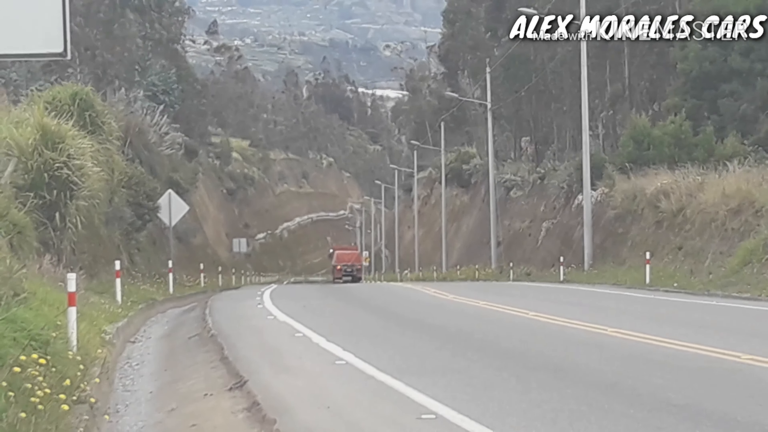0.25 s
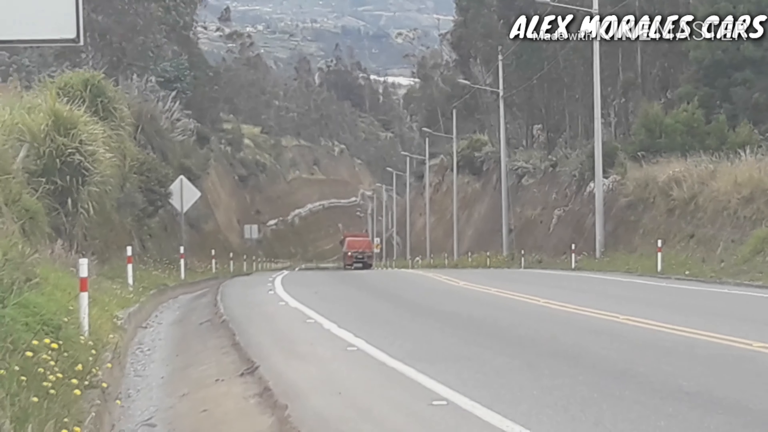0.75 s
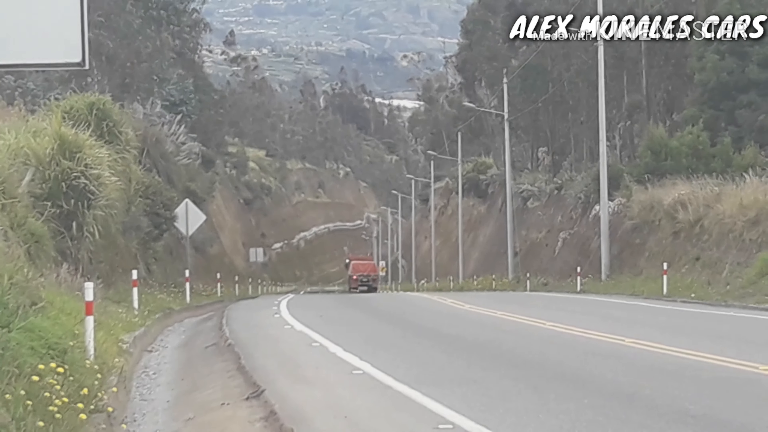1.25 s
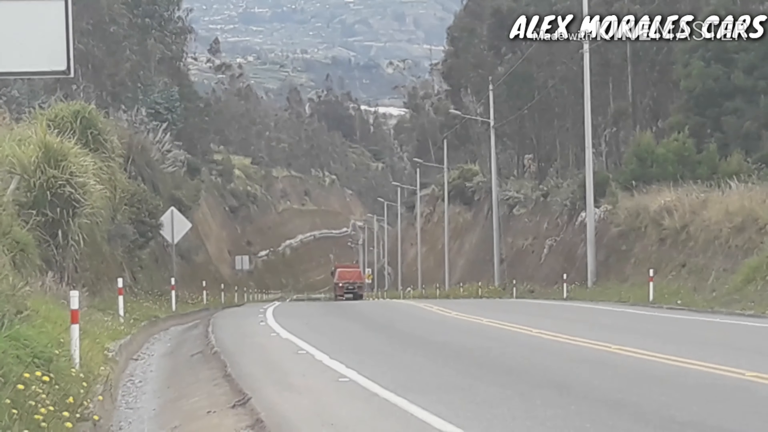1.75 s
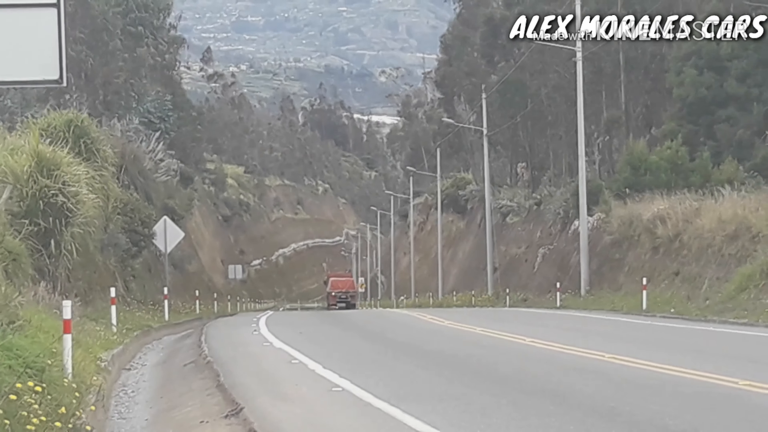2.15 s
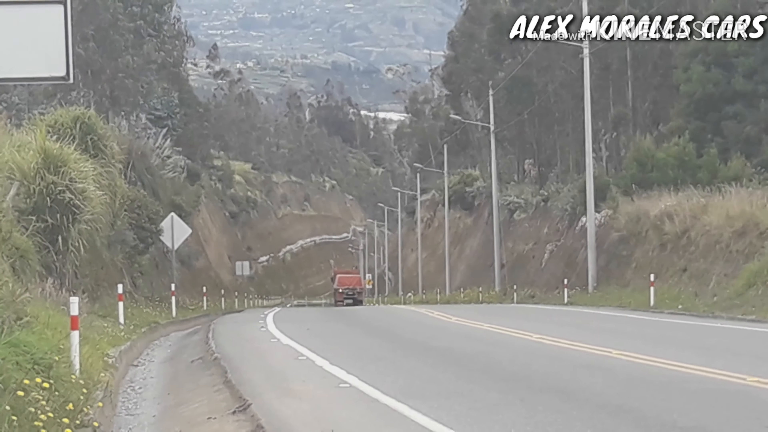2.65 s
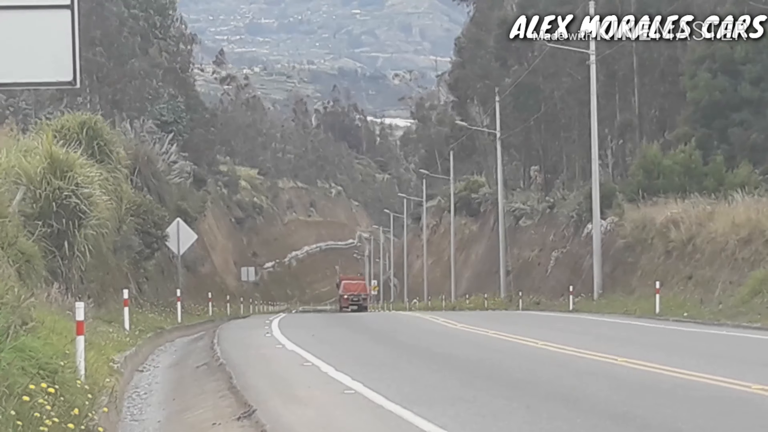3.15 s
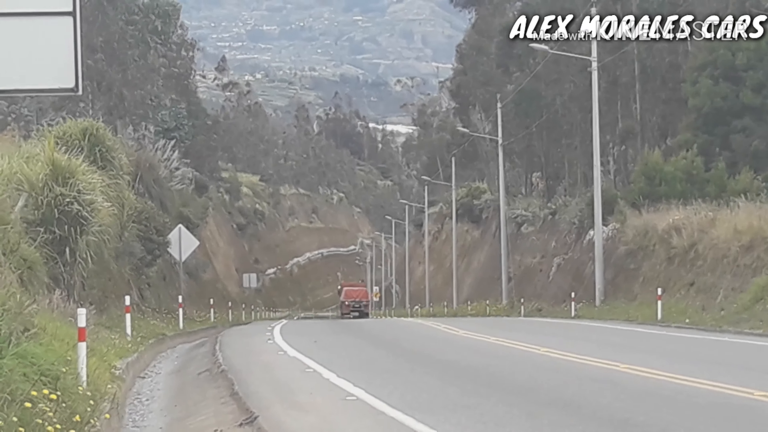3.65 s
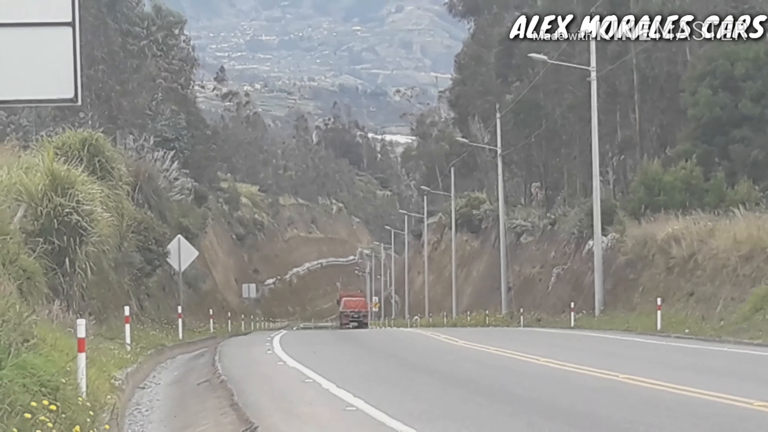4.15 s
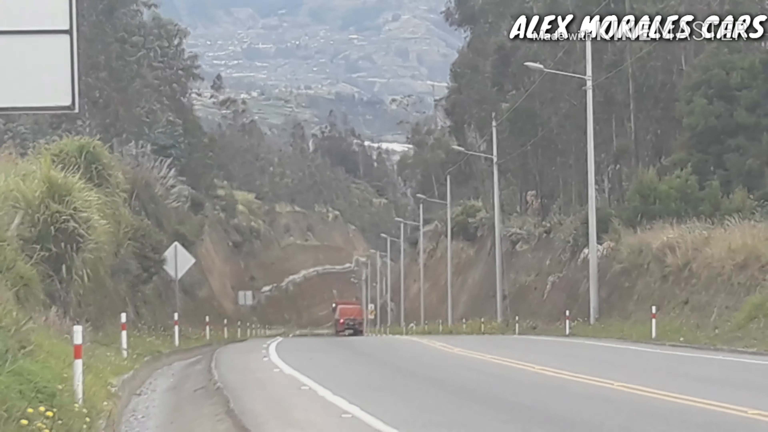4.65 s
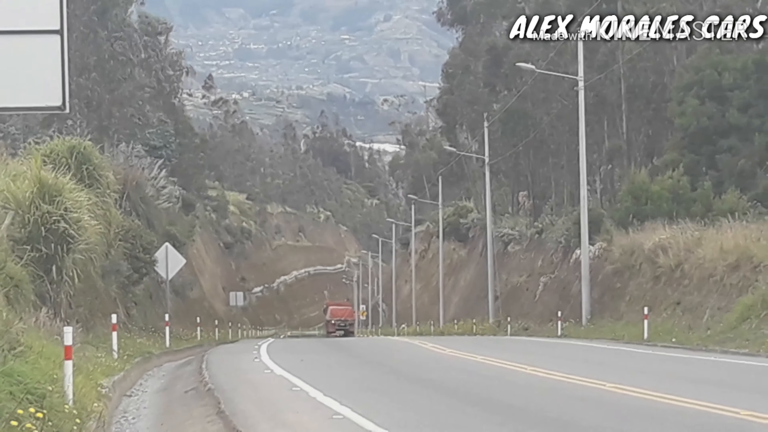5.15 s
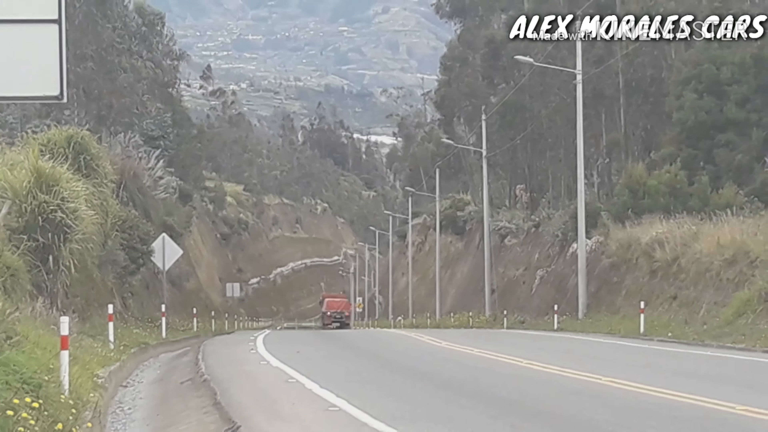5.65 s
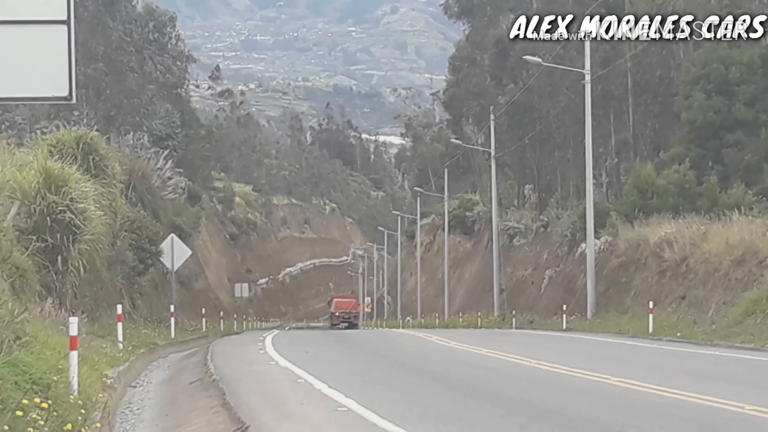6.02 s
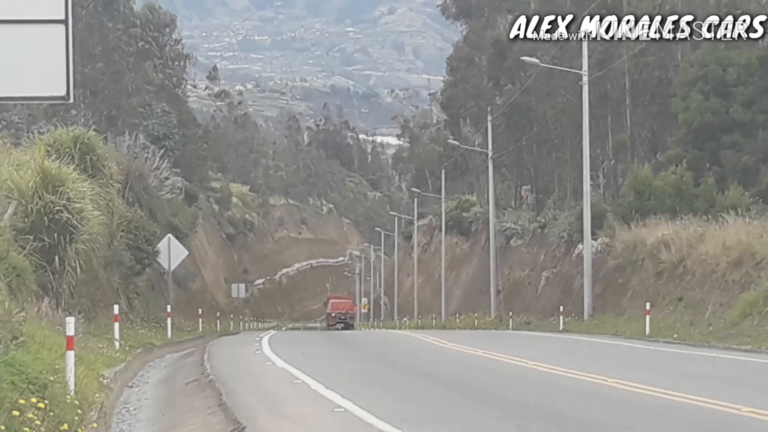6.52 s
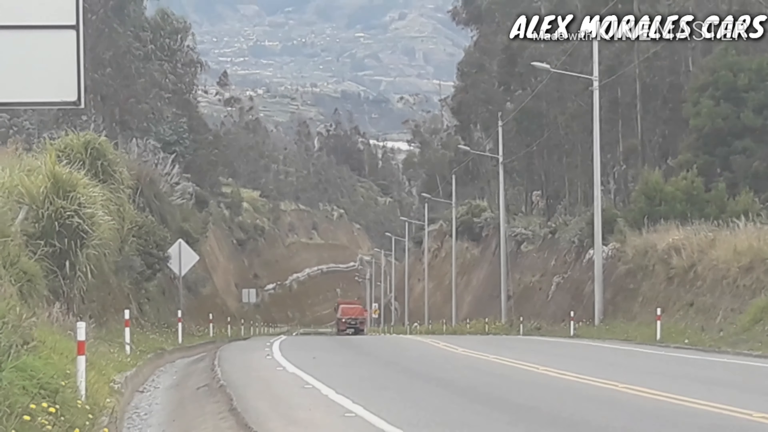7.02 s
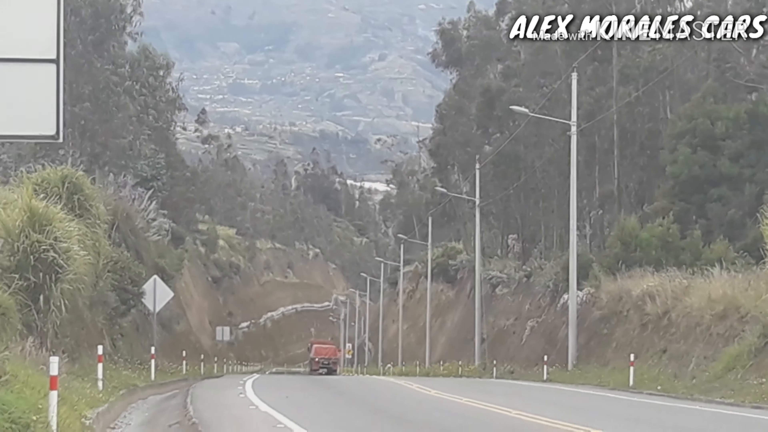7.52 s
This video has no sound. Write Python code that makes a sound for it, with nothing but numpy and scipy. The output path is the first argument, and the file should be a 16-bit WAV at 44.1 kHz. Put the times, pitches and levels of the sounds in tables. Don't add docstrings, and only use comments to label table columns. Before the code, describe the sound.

Low buzzing engine-brake drone of a faraway truck on a mountain road, faint bird whistles, and a sudden harsh burst of microphone handling.

```python
import sys
import numpy as np
from scipy import signal
from scipy.fft import rfft, irfft, next_fast_len
from scipy.io import wavfile
from scipy.ndimage import uniform_filter1d

SR = 44100
rng = np.random.default_rng(int(sys.argv[2]) if len(sys.argv) > 2 else 0)


def dump_mix(stems):
    frames = np.atleast_2d(stems).T
    limited = np.clip(frames, -1, 1)
    pcm = np.round(limited * 32767).astype(np.int16)
    wavfile.write(sys.argv[1], SR, pcm)


def ratio(d):
    e = np.asarray(d, float) / 20
    return 10 ** e


N = 343098


def evened(x):
    return x / np.sqrt(np.mean(x ** 2) + 1e-20)


def read(points, hz):
    f, value = np.transpose(points)
    return np.interp(np.log(hz + 1), np.log(f + 1), value)


def columns(rows):
    s, *values = np.transpose(rows)
    return [np.interp(np.arange(N) / SR, s, v) for v in values]


def eased(rows):
    s, value = np.transpose(rows)
    place = np.interp(np.arange(N) / SR, s, np.arange(len(s)))
    smooth_place = np.floor(place) + (1 - np.cos(np.pi * (place % 1))) / 2
    return np.interp(smooth_place, np.arange(len(s)), value)


def coloured(x, spectrum):
    size = next_fast_len(N)
    gain = ratio(read(spectrum, np.fft.rfftfreq(size, 1 / SR)))
    return irfft(rfft(x, size) * gain, size)[:N]


def wander(count, per_s):
    width = max(round(100 / per_s), 1)
    z = rng.standard_normal((count, N * 100 // SR + 2))
    return evened(uniform_filter1d(uniform_filter1d(z, width, 1), width, 1))


def engine_speed():
    # time in seconds, shaft speed in Hz.
    speed_points = [(0, 34.19), (.45, 34.26), (.85, 34.06), (1.35, 34.26), (2.15, 33.98), (3.2, 33.52),
                    (3.55, 33.48), (4.0, 33.12), (4.4, 33.01), (5.0, 34.65), (5.18, 34.5), (5.66, 37.2),
                    (6.15, 35.55), (6.6, 36.58), (7.18, 35.2), (7.78, 35.0)]
    return eased(speed_points)


def brake():
    # time in seconds, level in dB, colour (0 first stretch of road, 1 second stretch,
    # 2 gear caught, 3 speed hunting), rasp in dB.
    path_points = [(0, 1.6, 1, -4), (.6, 0.26, 0.3, -8), (1.6, 0.45, 0, 6), (2.4, -0.056, 0.1, 3),
                   (3, -0.57, 1.43, 4), (3.8, -1.1, 0.96, -5), (4.36, 0.38, 1, -6), (5.02, -1.5, 3, 3.5),
                   (5.3, 0.6, 1.5, 5), (5.45, -0.013, 3, 3), (7.78, 1.6, 3.5, 5.5)]
    level_db, colour, rasp_db = columns(path_points)
    t = np.arange(N) / SR
    gear_out_s, let_go_s, gear_in_s, bite_s = 4.335, .085, 5.0, .03
    coasting = np.clip((t - gear_out_s) / let_go_s, 0, 1) - np.clip((t - gear_in_s) / bite_s, 0, 1)
    return level_db - 16.5 * coasting, colour, rasp_db + 13 * coasting


def exhaust_tones(turns, speed, colour, pipe, sway_db=1.2, jitter_rad=.022, uneven_rad=.9, scatter_rad=.35):
    # order (multiple of the shaft speed), rms level in dB in each of the four colours.
    strong_orders = [(2.5, -51, -59, -51, -58), (3.0, -60, -59, -60, -51), (5.0, -58, -54, -63, -63),
                     (6.0, -58, -60, -77, -70), (7.0, -73, -69, -55, -62), (9.0, -57, -59, -50, -48),
                     (10.0, -57, -54, -65, -71), (11.0, -67, -66, -60, -56), (12.0, -53, -54, -56, -58),
                     (12.5, -56, -62, -66, -67), (13.0, -52, -57, -64, -62), (14.0, -63, -64, -56, -58),
                     (15.0, -69, -62, -69, -63), (16.0, -64, -67, -68, -63), (17.0, -53, -57, -64, -62),
                     (17.5, -63, -65, -73, -71), (19.0, -60, -66, -63, -66), (20.0, -62, -58, -64, -56),
                     (20.5, -73, -69, -67, -66), (23.0, -68, -73, -63, -67), (29.0, -90, -90, -71, -75),
                     (32.5, -82, -84, -86, -76), (33.0, -82, -84, -81, -81), (35.5, -80, -87, -90, -84)]
    # pitch in Hz, width in Hz, level in dB.
    bank_dips = [(319, 4, -10), (388, 4, -7), (517, 8, -8), (706, 10, -7)]
    strong = {row[0]: row[1:] for row in strong_orders}
    step = 8
    t, grid = np.arange(0, N + step, step) / SR, np.arange(N * 100 // SR + 2) / 100
    coarse_turns = np.interp(t * SR, np.arange(N), turns)
    tint, shaft_hz = (np.interp(grid * SR, np.arange(N), c) for c in (colour, speed))
    echoes = np.interp(tint, np.arange(4), [2.2, 1, 2, 2.4])
    level, phase, chance = wander(count=96, per_s=2.9), wander(count=96, per_s=2.3), rng.standard_normal((96, 2))
    low = np.zeros(len(t))
    for k, order in enumerate(np.arange(4, 100) / 2):
        if order in strong:
            db = np.interp(tint, np.arange(4), strong[order]) + 1
        else:
            db = -68 + read(pipe, order * speed[0]) + 2.2 * chance[k, 0]
        for dip_hz, width, dip_db in bank_dips:
            db = db + dip_db * np.exp(-((order * shaft_hz - dip_hz) / width) ** 2)
        lean = uneven_rad * [0, 1, -1][round(order) % 3] + scatter_rad * echoes * chance[k, 1]
        waver = jitter_rad * order * (.5 + tint / 3) * phase[k]
        swayed = ratio(db + sway_db * level[k]) * np.exp(1j * (lean + waver))
        low += (np.interp(t, grid, swayed) * np.exp(2j * np.pi * order * coarse_turns)).real
    return np.sqrt(2) * signal.resample_poly(low, step, 1)[:N]


def exhaust_puffs(turns, rasp_db, pipe):
    # pitch in Hz, level in dB.
    rasp_colour = [(800, -24), (1000, 5), (1250, 6.5), (1380, -6.5), (1550, -1.5), (1750, -44), (2300, -31)]
    blow = (3 * turns).astype(int)
    cylinder_db = np.array([3, -2, 0, 1, -3, -1])[blow % 6]
    strength = ratio(cylinder_db + 1.2 * rng.standard_normal(blow[-1] + 1)[blow])
    gas = (0.24 + strength * np.exp(-(3 * turns % 1) / 0.52)) * rng.standard_normal(N)
    rush = ratio(-53) * evened(coloured(gas, pipe))
    return rush + ratio(-74.5 + rasp_db) * evened(coloured(gas, rasp_colour))


def exhaust():
    # pitch in Hz, level in dB.
    pipe_colour = [(60, -38), (200, -5), (330, 0.5), (800, -5.5), (950, -22), (1250, -36), (1600, -32),
                   (2100, -56)]
    speed, (brake_db, colour, rasp_db) = engine_speed(), brake()
    turns = np.cumsum(speed) / SR
    hard_blow_s = 3.205
    turns = turns - turns[round(hard_blow_s * SR)] + 200
    tones = exhaust_tones(turns, speed, colour, pipe_colour)
    return ratio(brake_db) * (tones + exhaust_puffs(turns, rasp_db, pipe_colour))


def whine():
    whine_levels = [-72, -66, -71, -72]
    # time in seconds, pitch in Hz, level in dB.
    free_whine = [(4.36, 835, -90), (4.42, 865, -73), (4.55, 903, -77), (4.85, 905, -78), (5.0, 895, -81),
                  (5.1, 880, -90)]
    speed, (brake_db, colour, _), (free_hz, free_db) = engine_speed(), brake(), columns(free_whine)
    slow = wander(count=2, per_s=7.6)
    flutter_db, drift = (np.interp(np.arange(N) * 100 / SR, np.arange(len(w)), w) for w in slow)
    engaged_hz = 25.25 * speed * (1 + 0.0013 * drift)
    engaged_db = np.interp(colour, np.arange(4), whine_levels) + brake_db
    engaged = np.sin(2 * np.pi * np.cumsum(engaged_hz) / SR) * ratio(engaged_db)
    free = np.sin(2 * np.pi * np.cumsum(free_hz * (1 + 0.0042 * drift)) / SR) * ratio(free_db)
    gear_out = np.clip(1 - ratio(brake_db), 0, 1)
    return np.sqrt(2) * ratio(1.5 * flutter_db) * (engaged + free * gear_out)


def road(patchy_db=2.0):
    # pitch in Hz, level in dB per Hz.
    road_colour = [(20, -45), (43, -26.5), (75, -2.5), (190, -10), (487, -26.5), (860, -31.5), (980, -42.5),
                   (2300, -49.5)]
    # time in seconds, dB above the road, half width in seconds.
    road_lumps = [
        (.1, 3.5, 0.054),
        (.62, 1, 0.11),
        (.765, 9.5, 0.027),
        (2.52, 1.5, .08),
        (2.67, -5, 0.054),
        (2.88, 2, .05),
        (4.62, -1.5, 0.034),
    ]
    hz = np.fft.rfftfreq(2048, 1 / SR)
    a, b, patches = rng.standard_normal((N // 512 + 5, 1025, 3)).T
    patches = evened(uniform_filter1d(uniform_filter1d(patches, 5, 0), 8, 1))
    colour_db = read(road_colour, hz) - np.maximum(hz - road_colour[-1][0], 0) / 30
    z = (a + 1j * b) * ratio(colour_db[:, None] + patchy_db * patches)
    rumble = evened(signal.istft(z, nperseg=2048, noverlap=1536)[1][:N])
    t = np.arange(N) / SR
    lumps_db = sum(db * np.exp(-((t - s) / width) ** 2) for s, db, width in road_lumps)
    return ratio(-45 - 0.4 * t + lumps_db) * rumble


def self_noise():
    # pitch in Hz, level in dB per Hz.
    hiss_colour = [(1060, -27), (1800, -3), (4010, -2.5), (7590, -13), (14900, -2), (15400, -7)]
    return ratio(-68.5) * evened(coloured(rng.standard_normal(N), hiss_colour))


def bumps():
    # time in seconds, peak in dB, pitch in Hz, tick in dB.
    case_bumps = [
        (.7525, -28, 105, -19),
        (.868, -56, 300, 3),
        (7.277, -27, 180, -40),
    ]
    out, t = np.zeros(N), np.arange(2000) / SR
    for s, db, hz, tick_db in case_bumps:
        swing = -np.sin(2 * np.pi * hz * t) * t * np.exp(-t / 0.0027)
        tick = ratio(tick_db) * rng.standard_normal(len(t)) * np.exp(-abs(t - .007) / 0.0011)
        dull_tick = uniform_filter1d(uniform_filter1d(tick, size=6), size=6)
        out[round(s * SR):][:len(t)] += ratio(db) * (swing / abs(swing).max() + dull_tick)
    return out


def bird():
    # seconds from the start of the whistle, pitch in Hz, level in dB.
    whistle_points = [(0, 3330, -15), (.03, 3200, -7), (.055, 3070, 0), (.07, 2960, 0), (.09, 2830, -6),
                      (.125, 2580, -4), (.145, 2520, -16)]
    # start in seconds, level in dB.
    bird_calls = [
        (4.3, -64),
        (6.85, -68),
    ]
    out, (s, hz, db) = np.zeros(N), np.transpose(whistle_points)
    t = np.arange(0, s[-1], 1 / SR)
    for start, call_db in bird_calls:
        tremble = 1 + 0.34 * np.cos(2 * np.pi * 38 * (t - .062))
        note = np.sin(2 * np.pi * np.cumsum(np.interp(t, s, hz)) / SR) * ratio(call_db + np.interp(t, s, db))
        out[round(start * SR):][:len(t)] += note * tremble * signal.windows.tukey(len(t), .2)
    i = np.arange(8000)
    trees = rng.standard_normal(8000) * (rng.random(8000) < .03) * ratio(-60 * i / SR / .3) * (i > 700)
    return out + ratio(-8) * signal.oaconvolve(out, trees / np.linalg.norm(trees))[:N]


def finger(slips_per_s=1500, spread_db=3.0):
    # time in seconds, pressure in dB, slide in dB (scrape for that pressure).
    rub_strokes = [
        [(7.276, -55, -25), (7.281, -37, -30), (7.3, -28, -35), (7.32, -17.5, -17), (7.35, -17.5, -12.5),
         (7.41, -3.5, -10), (7.44, -5, 0), (7.46, -4.5, -5), (7.52, -4, -10.5)],
        [(7.53, -21.5, -6.5), (7.555, -14.5, -10), (7.577, -18, -7.5), (7.586, -33.5, -11), (7.605, -48, -9)],
        [(7.622, -35.5, -18), (7.632, -9, -13), (7.638, -5.5, -11), (7.66, -14.5, -2.5), (7.705, -21.5, -6),
         (7.718, -28, 5), (7.732, -54, 6.5), (7.78, -50.5, 2)],
    ]
    # pitch in Hz, level in dB.
    thud_colour, push_colour = [(100, -19), (200, 0.5), (300, 2), (500, -2.5), (800, -5), (1300, -18),
                                (2500, -70)], [(20, -48), (60, 5), (120, 20), (190, 15), (300, -61)]
    scrape_colour, fizz_colour = [(500, -10), (1200, 3.5), (2500, -3), (4000, -11.5), (6000, -26),
                                  (7500, -44), (9000, -62)], [(6000, -25), (9000, -14), (11000, -1), (14500, 0),
                                                  (15500, 2), (15900, -50)]
    # time in seconds, peak in dB.
    nail_catches = [
        (7.3214, -53),
        (7.3771, -31),
        (7.3916, -16),
        (7.4024, -23),
        (7.4101, -24),
        (7.5198, -29),
        (7.637, -42),
    ]
    t = np.arange(N) / SR
    rows = [row for stroke in rub_strokes for row in stroke]
    thud_db, slide_db = columns(rows)
    sunk = np.clip((t - 7.435) * 100, 0, 1)
    sinking_db, resting_db = -7.5, -18
    push_db = 0.61 * thud_db + sinking_db + (resting_db - sinking_db) * sunk
    slips = (rng.random(N) < slips_per_s / SR) * ratio(spread_db * np.minimum(rng.exponential(1, N), 4))
    slips = evened(slips * rng.choice([-1, 1, 1], N))
    thud = evened(coloured(slips + .5 * rng.standard_normal(N), thud_colour))
    push = evened(coloured(slips + .5 * rng.standard_normal(N), push_colour))
    scrape = evened(coloured(.55 * slips + rng.standard_normal(N), scrape_colour))
    fizz = ratio(0.075 * thud_db - 28.0) * evened(coloured(rng.standard_normal(N), fizz_colour))
    touching = np.clip((t - rows[0][0]) * 200, 0, 1)
    out = ratio(thud_db) * thud + ratio(thud_db + slide_db) * (scrape + fizz) + ratio(push_db) * push
    out = touching * out
    click_t = np.arange(40) / SR
    click = np.sin(2 * np.pi * 7000 * click_t) * np.exp(-click_t / .0002)
    for s, db in nail_catches:
        out[round(s * SR):][:len(click)] += ratio(db + 4) * click
    return out


def scene():
    return (exhaust() + whine() + road() + bumps() + bird() + finger())[None]


def low_pass(x):
    return signal.sosfilt(signal.butter(12, 15600, fs=SR, output="sos"), x)


def record(dry):
    mix = np.clip(dry + self_noise(), -.99, .99)
    return low_pass(mix)


dry = scene()
out = record(dry)
dump_mix(out)
```